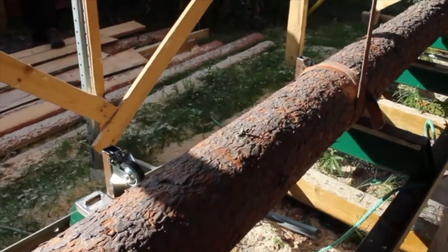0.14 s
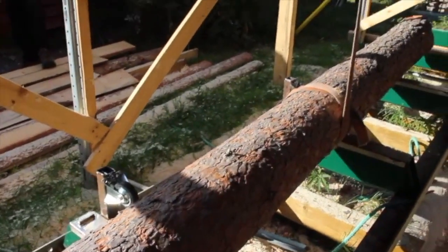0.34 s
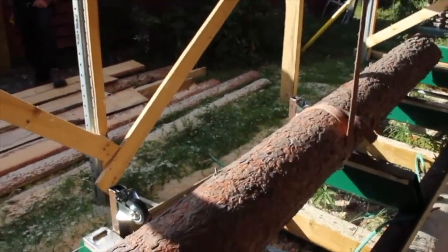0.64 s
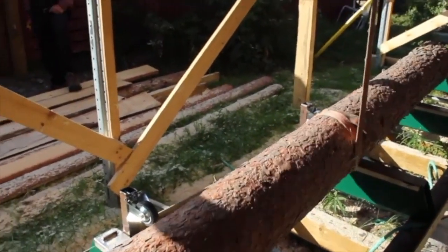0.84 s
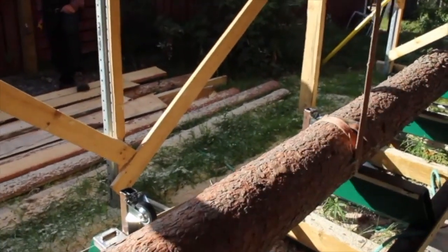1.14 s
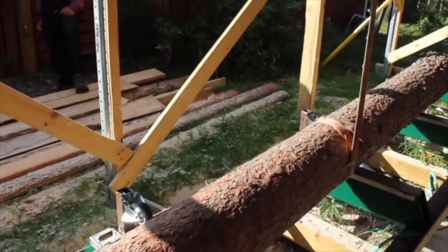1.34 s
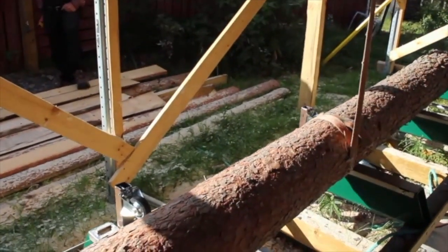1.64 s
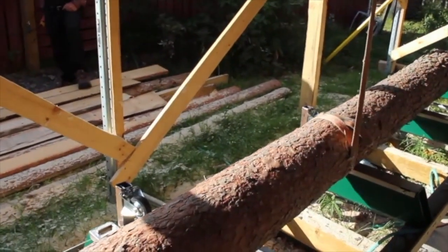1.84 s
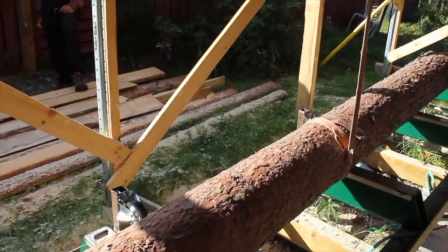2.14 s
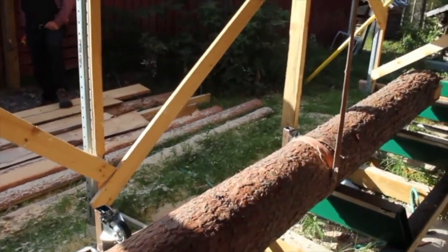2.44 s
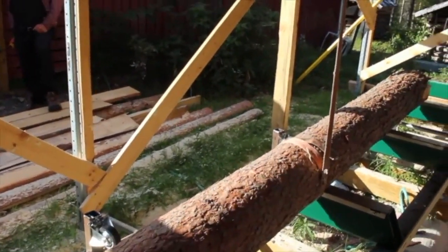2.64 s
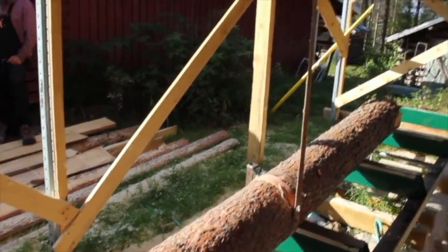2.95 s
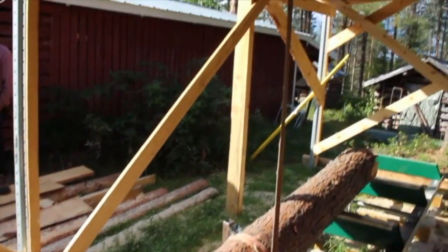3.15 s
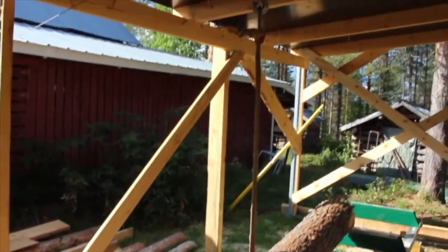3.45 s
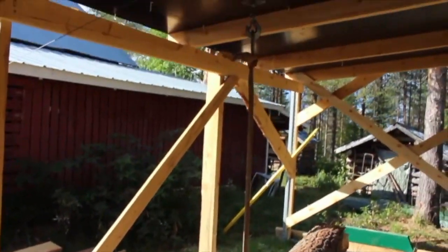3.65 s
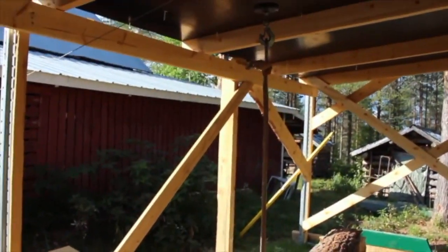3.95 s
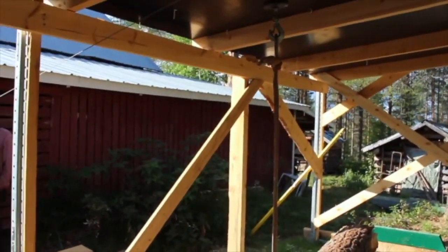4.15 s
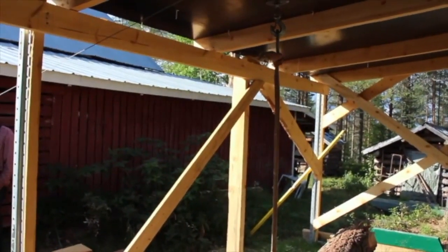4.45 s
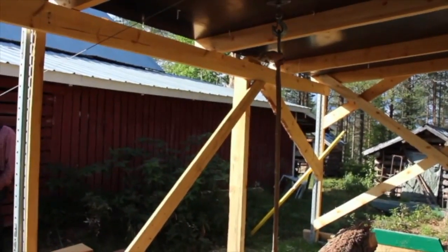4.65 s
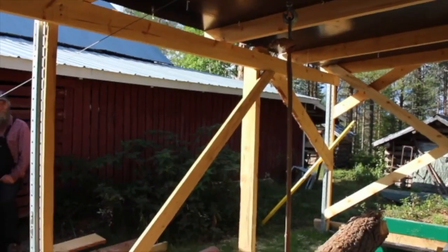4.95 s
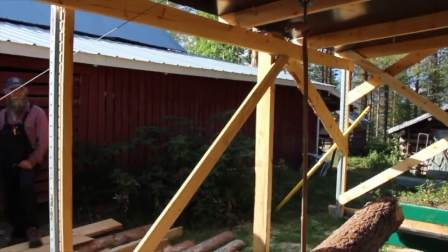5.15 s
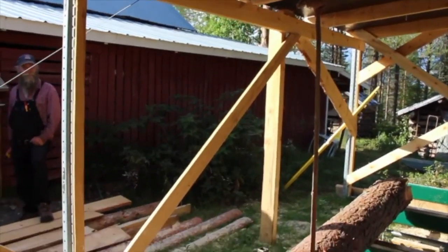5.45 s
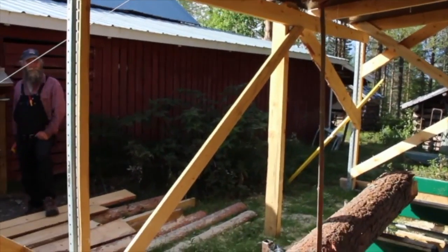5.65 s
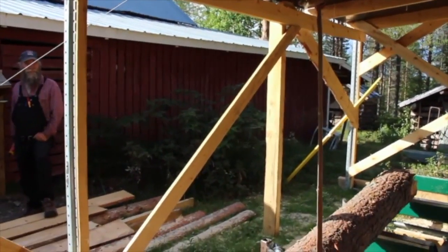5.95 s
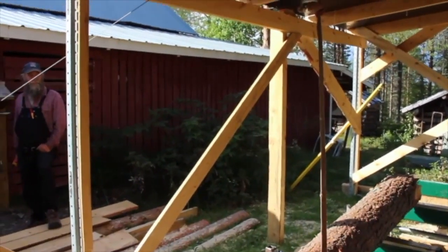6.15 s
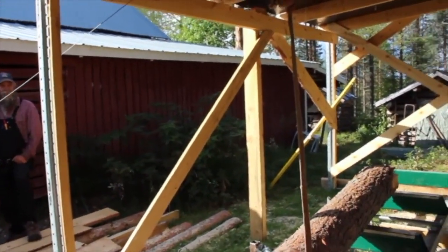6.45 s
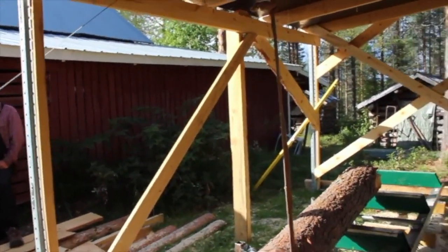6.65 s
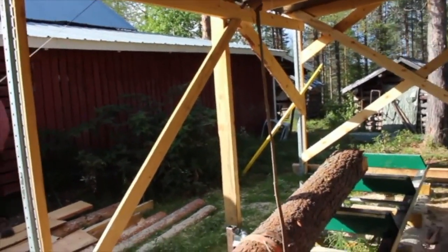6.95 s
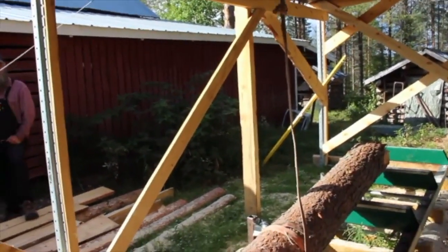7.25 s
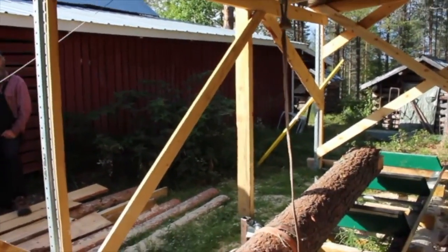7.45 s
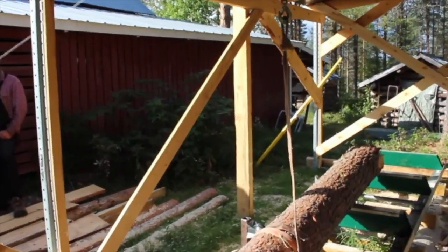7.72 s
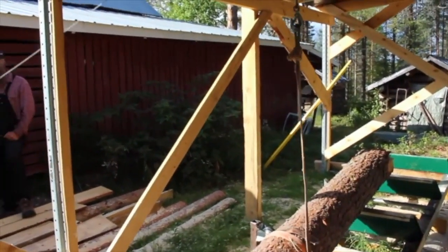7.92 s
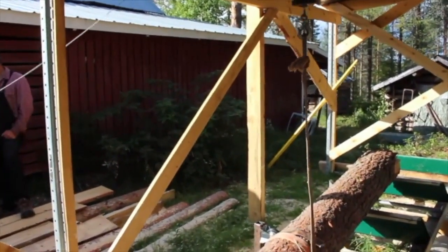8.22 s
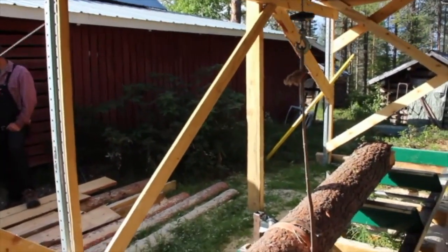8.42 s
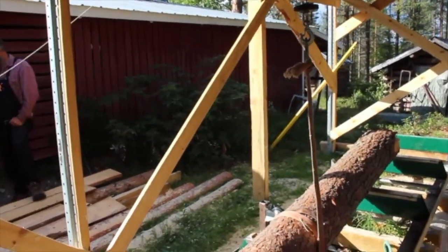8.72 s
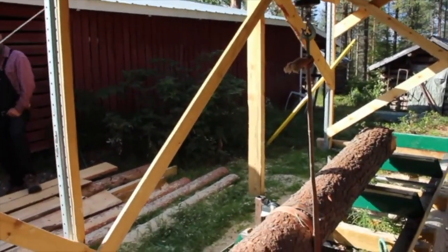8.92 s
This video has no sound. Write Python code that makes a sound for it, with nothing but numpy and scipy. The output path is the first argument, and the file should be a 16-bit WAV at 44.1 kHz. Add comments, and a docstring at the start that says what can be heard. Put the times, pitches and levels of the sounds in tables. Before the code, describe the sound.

Close up under an open timber roof, an electric winch runs in seven bursts, each opening and closing with a metallic clack. Gears rattle and grind, the loaded frame groans, and a log thumps hard twice and rocks with woody knocks. A strap rasps over bark. The later pulls are longer and steadier, in a quiet yard with soft air hiss.

```python
"""An electric winch under an open timber roof rolls a log: brake clacks are decaying contact noise plus
steel modes, and the gears are dense tiny impacts and a faint tooth-mesh tone coloured by their housing.
The loaded frame groans in narrow noise bands, the drum squeals once and the strap rasps by stick and slip.
The log grinds, thumps and creaks as ringing wood modes, its steel rails ring, and the beams hum and rumble.
Roof and a wooden wall answer with decaying noise tails; quiet yard air, a shaped hiss, lies underneath."""
import sys
import numpy as np
from scipy import signal
from scipy.fft import rfft, irfft, next_fast_len
from scipy.io import wavfile
from scipy.ndimage import uniform_filter1d, map_coordinates

SR = 44100
rng = np.random.default_rng(int(sys.argv[2]) if len(sys.argv) > 2 else 0)


def dump(signal):
    """Clip the signal to [-1, 1] and save it as 16-bit WAV at the path in sys.argv[1]."""
    limited = np.clip(np.atleast_2d(signal).T, -1, 1)
    pcm = np.round(limited * 32767).astype(np.int16)
    wavfile.write(sys.argv[1], SR, pcm)


def linear_from_db(decibels):
    """Turn decibels (scalar or array-like) into linear amplitude factors; 0 gives 1."""
    return 10 ** (np.asarray(decibels, float) / 20)


N = 400428
T = np.arange(N) / SR
COAST_DB_PER_S = 157  # fall of the gears and of the rolling log

# Pulls of the winch: (brake lets go [s], brake bites [s], gears [dB], letting-go clack [dB], biting clack [dB])
RUNS = [(0.2888, 0.866, -29, -6.5, -8), (1.8024, 2.189, -28, -3.5, -30), (3.5322, 3.828, -36, -3, -16),
        (4.1608, 4.4408, -32, -3.5, -13), (4.992, 5.4002, -30.5, -7, -10.5),
        (5.802, 6.6738, -27.5, -3.5, -9), (6.8684, 8.5886, -29, -9.5, -7)]
# Load on the frame, one list per loaded pull: (time [s], groan level [dB])
LOAD = [
    [(0.3, -35), (0.328, -26), (0.692, -26.5), (0.766, -21.5), (1.036, -37.5), (1.1, -59)],
    [(1.87, -16.5), (1.914, -35), (1.932, -19), (2.16, -41), (2.252, -41), (2.3, -31.5)],
    [(3.6, -12), (3.628, -24), (3.736, -51), (3.868, -32), (3.888, -51), (3.95, -53)],
    [(4.17, -38), (4.198, -31), (4.368, -31), (4.416, -67), (4.45, -41), (4.6, -59)],
    [(5.0, -38.5), (5.154, -20.5), (5.252, -32.5), (5.306, -26), (5.402, -25.5), (5.52, -60)],
    [(5.82, -34), (5.894, -31.5), (5.92, -19), (6.108, -23), (6.192, -34.5), (6.7, -46)],
]
# Drum binding once: (from [s], to [s], base pitch [Hz], level [dB])
SQUEAL = (.418, .452, 510, -17)
# Log landing: (time [s], nominal peak [dB])
THUMPS = [(1.854, -3), (3.587, -6.5)]
# Log rocking to rest near the end of a pull, and the strap ceasing to slip at 2.175 s: (time [s], nominal peak
# [dB])
SETTLES = [(0.963, -16), (2.175, -25), (3.834, -12.5), (4.445, -12)]
# Modes of brake, housing and hook: (frequency [Hz], relative level [dB], t60 before cap and scaling [s])
STEEL = [(534, -7, 0.076), (835, 8.5, 0.14), (1412, 2, 0.5), (1960, 3, 0.21), (2862, -20, 0.66),
         (3010, 17, 0.041), (3900, -12.5, 0.27), (4200, -9, 0.063), (4660, 4.5, 0.22)]


def unit(x):
    """Normalisation: scales a signal to rms 1."""
    return x / np.sqrt(np.mean(x ** 2) + 1e-20)


def along(points, hz):
    """Log-frequency interpolation: reads a curve of (frequency [Hz], value) points."""
    f, v = np.transpose(points)
    return np.interp(np.log(hz + 1), np.log(f + 1), v)


def wobble(rate):
    """Slow random modulation: a smooth curve through rate random knots a second."""
    knots = rng.standard_normal(int(N * rate / SR) + 4)
    return map_coordinates(knots, [T * rate])


def filtered(x, response):
    """Linear filtering: multiplies the spectrum by a real or complex response of frequency."""
    m = next_fast_len(x.shape[-1] + 8192)  # room for the filter to ring out
    spectrum = rfft(x, m) * response(np.fft.rfftfreq(m, 1 / SR))
    return irfft(spectrum, m)[..., :x.shape[-1]]


def pair(noise, alike):
    """Interchannel coherence: mixes two noises into left and right of a given likeness."""
    def weights(hz):
        turn = np.arccos(np.clip(along(alike, hz), -1, 1)) / 2
        return np.array([np.cos(turn), np.sin(turn)])
    mid, side = filtered(noise, weights)
    return np.array([mid + side, mid - side])


def gate(rows, rise, sag_db, fall_db):
    """Amplitude envelope of (from [s], to [s], level [dB]) rows: rise [s], sagging hold, fall [dB/s]."""
    out = 0
    for s, e, db in rows:
        sag = sag_db * (np.clip(T, s, e) - s)
        fall = fall_db * np.maximum(T - e, 0)
        out = out + np.clip((T - s) / rise, 0, 1) * linear_from_db(db - sag - fall)
    return out


def grit(rate, spread_db):
    """Shot noise: random tiny impacts of uneven size, rate a second."""
    chance, size, sign = rng.random(N), rng.standard_normal(N), rng.standard_normal(N)
    return unit((chance < rate / SR) * linear_from_db(spread_db * size) * sign)


def noise_band(turn, width_hz):
    """Quadrature modulation: carries two slow noises on a phase, making a band around its pitch."""
    a, b = filtered(rng.standard_normal((2, N)), lambda f: 1 / (1 + (f / width_hz) ** 2))
    return unit(a * np.cos(turn) + b * np.sin(turn))


def ring(modes, t, low_db, split_hz, slow):
    """Modal decay: damped sines of varied strength and pitch; low_db lifts those under split_hz."""
    hz, db, t60 = np.transpose(modes)[:, :, None]
    luck = rng.standard_normal((3, len(modes), 1))
    decay_db = 60 * t / (np.minimum(t60, .25) * slow)
    level = db + 2 * luck[0] + low_db * (hz < split_hz) - decay_db
    phase = 2 * np.pi * hz * (1 + 0.0125 * luck[1]) * t + luck[2]
    return np.sum(linear_from_db(level) * np.sin(phase), axis=0)


def turning():
    """Drive and inertia: gears spin up, coast down, race as the strap slips and grind as the drum binds."""
    spin_up_s, race_db, bind_db = 0.037, -14.5, -26.5  # race_db is relative to the slipping
    dropout_db, dropout_s = 39, 0.091  # the rattle drops out briefly after each heavy thump
    run = gate([row[:3] for row in RUNS], spin_up_s, 0, COAST_DB_PER_S)
    bind = gate([(SQUEAL[0], SQUEAL[1], bind_db)], 0.0064, 0, COAST_DB_PER_S)
    dropout = sum((T > s) * np.exp(-((T - s) / dropout_s) ** 4) for s, _ in THUMPS)
    return (run + bind + linear_from_db(race_db) * slipping()) * linear_from_db(-dropout_db * dropout + 0.46 * wobble(4.5))


def gears():
    """Impact excitation of resonances: teeth rattle in the housing; their steady mesh whines faintly."""
    # Narrow resonances of the gear housing: (frequency [Hz], relative level [dB])
    resonances = [(872.1, -39), (958.2, -53.5), (1120, -42.5), (1200, -41), (1249, -45), (1373, -43),
                  (1599, -51), (1701, -49.5), (2266, -51.5), (2406, -71), (2562, -53.5), (3036, -54.5),
                  (4797, -57.5), (5313, -60)]
    # Broad colour of the rattle: (frequency [Hz], relative spectral level [dB])
    colour = [(88, -50), (150, -10), (674, -2), (742, -7.5), (866, 2), (1670, -4), (1910, -7), (2310, -5),
              (3670, -13), (5400, -17.5), (15000, -28)]
    # Tooth mesh: (multiple of mesh rate [1], mean amplitude re rattle rms [dB])
    mesh = [(3, -30), (4, -27)]
    mesh_hz = 557

    def housing(f):
        peaks = sum(linear_from_db(db + 45.5) / (1 + ((f - hz) / (0.0076 * hz)) ** 2) for hz, db in resonances)
        return (.6 * linear_from_db(along(colour, f)) + peaks) / (1 + (f / 9300) ** 12)
    rattle = unit(filtered(grit(rate=6500, spread_db=2.5), housing))
    turn = 2 * np.pi * np.cumsum(mesh_hz * (1 + 0.0051 * wobble(4))) / SR
    whine = sum(linear_from_db(db + 3 * wobble(9)) * np.sin(k * turn) for k, db in mesh)
    return turning() * linear_from_db(wobble(25)) * (rattle + whine)


def clacks(events, swell, t60, slow):
    """Contact chatter and modal ringing: noise swells and dies, ringing steel unevenly, one mode most."""
    # Colour of the contacts: (frequency [Hz], relative spectral level [dB])
    colour = [(290, -43), (500, -13), (1050, -7), (3700, -3), (8580, -16.5), (16000, -38.5)]
    out, t = np.zeros(N + SR), np.arange(SR // 3) / SR
    rise = (1 - np.exp(-t / swell)) ** 4
    for s, db, low_db, hz in events:
        contacts = rise * linear_from_db(-60 * t / t60) * rng.standard_normal(len(t))
        crack = filtered(contacts, lambda f: linear_from_db(along(colour, f) + (low_db + 14) * (f < 1800)))
        modes = ring(STEEL, t, low_db + 9.5, split_hz=1800, slow=slow)
        modes += 3.3 * linear_from_db(-60 * t / (0.23 * slow)) * np.sin(2 * np.pi * hz * t)
        # loose parts break up the ringing
        loose = unit(filtered(rng.standard_normal(len(t)), lambda f: f < 220))
        clack = 2.58 * crack + 0.14 * rise * modes * (0.19 + loose)
        out[round((s - 1.4 * swell) * SR):][:len(t)] += linear_from_db(db) * clack
    return out[:N]


def brake():
    """Impact of brake on steel: a slower swell on letting go, a sharper one on biting."""
    let_go, bite = (-9, 2040), (-9.5, 3850)  # (relative low-frequency lift [dB], loudest ring [Hz])
    releases = [(s, db, *let_go) for s, _, _, db, _ in RUNS]
    bites = [(s, db, *bite) for _, s, _, _, db in RUNS]
    return (clacks(releases, swell=0.0038, t60=0.083, slow=0.37)
            + clacks(bites, swell=0.000831, t60=0.062, slow=0.68))


def jolts():
    """Impact of cable and hook: short contacts ring the steel as they jolt."""
    # Jolts: (time [s], nominal peak [dB], loudest ring [Hz])
    events = [(0.636, -13.5, 3880), (0.833, -17.5, 5550), (0.8593, -14, 3960), (0.9581, -15, 4250),
              (4.3168, -9.5, 1540), (4.3432, -15.5, 1990), (7.0929, -19, 2210), (7.555, -17.5, 2520)]
    low_db = -8
    return clacks([(s, db, low_db, hz) for s, db, hz in events], swell=0.000714, t60=0.064, slow=0.45)


def pull(lift_db):
    """Load envelope: each pull's gain, running out at 400 dB/s after it and silent before it."""
    out = np.zeros(N)
    for rows, lift in zip(map(np.array, LOAD), lift_db):
        s, db = rows.T
        after = np.maximum(T - s[-1], 0)
        out += (T >= s[0]) * linear_from_db(lift + np.interp(T, s, db) - 400 * after)
    return out


def groan():
    """Bending resonance: the frame shudders at its lowest pitch; strain brings out even overtones."""
    # Lowest bending pitch: (time [s], pitch [Hz])
    pitch = [(4.7, 255), (4.9, 222.9), (5.8, 220.7)]
    # Overtone gain of each loaded pull: (level re groan gain [dB])
    strain_db = [-7.5, -7, -5, 4.5, -11.5, -16]
    turn = 2 * np.pi * np.cumsum(np.interp(T, *np.transpose(pitch))) / SR
    colour = [(70, -10.5), (150, 3.5), (300, 14.5), (500, -45)]  # (frequency [Hz], relative level [dB])
    broad = unit(filtered(rng.standard_normal(N), lambda f: linear_from_db(along(colour, f))))
    lowest = noise_band(turn, width_hz=15.3)
    overtones = noise_band(2 * turn, width_hz=43.5)
    overtones += 0.53 * noise_band(4 * turn, width_hz=120)
    overtones += 0.67 * noise_band(6 * turn, width_hz=52)
    return pull([0] * len(LOAD)) * (0.78 * lowest + 0.48 * broad) + pull(strain_db) * overtones


def squeal():
    """Stick-slip tone of the binding drum: second and third multiples, fading out unevenly."""
    start, end, hz, db = SQUEAL
    envelope = np.clip((T - start) / 0.0015, 0, 1) * linear_from_db(-60 * np.maximum(T - end, 0) / 0.044)
    tone = np.sin(4 * np.pi * hz * T) + 0.67 * np.sin(6 * np.pi * hz * T)
    return envelope * linear_from_db(db + 6.4 * wobble(73.4)) * tone


def slipping():
    """Sliding-friction envelope: how hard the strap slips."""
    # Strap slipping: (from [s], to [s], level at the start [dB])
    slips = [(.4, .55, -36), (.84, 1.02, -37), (2.02, 2.195, -16), (3.53, 3.585, -30), (3.635, 3.74, -19),
             (4.29, 4.37, -29.5)]
    rise_s, sag_db_per_s, fall_db_per_s = 0.029, 23, 708
    return gate(slips, rise_s, sag_db_per_s, fall_db_per_s)


def strap():
    """Stick-slip friction over bark: dense grains in ragged patches, coloured by the steel hook."""
    # Colour of the rasp: (frequency [Hz], relative spectral level [dB])
    colour = [(1060, -33), (1800, -10.5), (5460, -10), (12100, -23.5), (13200, -54), (14600, -24),
              (15000, -90)]

    def hook(f):
        return 1 + sum(0.95 / (1 + ((f - hz) / 110) ** 2) for hz, _, _ in STEEL)
    z = signal.stft(grit(rate=14000, spread_db=-0.5), nperseg=256)[2]
    # noise smoothed over frequency, then over time
    patches = uniform_filter1d(rng.standard_normal(z.shape), size=7, axis=0)
    patches = uniform_filter1d(patches, size=5, axis=1)
    ragged = signal.istft(z * linear_from_db(3.5 * unit(patches)), nperseg=256)[1][:N]
    return slipping() * unit(filtered(ragged, lambda f: linear_from_db(along(colour, f)) * hook(f)))


def rolling():
    """Rolling contact noise: the log grinds round on its bed in a rough band that climbs as it turns."""
    # Rolling log: (time [s], band centre [Hz], level [dB])
    path = [(1.899, 290, -28), (2.02, 480, -32), (2.131, 558.5, -33.5), (2.2, 761.6, -26.5),
            (2.32, 800, -41.5)]
    s, hz, db = np.transpose(path)
    turn = 2 * np.pi * np.cumsum(np.interp(T, s, hz)) / SR
    fade_db = COAST_DB_PER_S * np.maximum(T - s[-1], 0)
    return (T > s[0]) * linear_from_db(np.interp(T, s, db) - fade_db) * noise_band(turn, width_hz=110)


def knocks(events, deep_db, spread):
    """Modal excitation of wood by contacts over spread [s]; light ones are crisper and die sooner."""
    # Modes of log and bed: (frequency [Hz], relative level [dB], t60 before cap and scaling [s])
    modes = [(148, -13, 5.0), (272, 8.5, 0.063), (500.6, 9, 0.076), (646, -2.5, 0.3), (972, 9.5, 0.073),
             (1315, -1, 0.14), (1250, -15, 0.33), (1528, -21, 0.35), (1656, 1, 0.069), (1990, -9.5, 0.16)]
    out, t = np.zeros(N + SR), np.arange(SR // 2) / SR
    for s, db in events:
        slow = np.clip(0.4 + 0.0067 * db, .1, 1)
        dull = filtered(rng.standard_normal(len(t)), lambda f: 1 / (1 + (f / 6000) ** 2))
        tick = linear_from_db(-.25 * db - 60 * t / (0.11 * slow)) * dull
        wood = ring(modes, t, deep_db + 13.5, split_hz=400, slow=slow) * (1 - np.exp(-t / 0.0007))
        contacts = (t <= spread) * rng.standard_normal(len(t))  # a single contact when spread is 0
        wood = signal.fftconvolve(wood, contacts / np.linalg.norm(contacts))[:len(t)]
        out[round(s * SR):][:len(t)] += linear_from_db(db - 5.0) * (wood + 0.56 * tick)
    return out[:N]


def log_on_bed():
    """Impact and creak: the log lands, creaks and rocks to rest, the rocking spread over 40 ms."""
    # Log creaking on its bed: (time [s], nominal peak [dB])
    creaks = [(0.085, -31.5), (0.121, -34.5), (0.135, -33), (0.154, -36.5), (0.194, -28.5), (0.213, -35),
              (0.229, -31), (0.245, -36), (8.974, -37), (9.059, -34.5)]
    thump_deep_db, settle_deep_db, creak_deep_db = -14, -11, -9.5  # relative lift of the deep modes
    single = knocks(THUMPS, thump_deep_db, spread=0) + knocks(creaks, creak_deep_db, spread=0)
    return single + knocks(SETTLES, settle_deep_db, spread=.04)


def rails():
    """Free vibration: the steel rails ring on faintly whenever the log rocks to rest or the strap stops
    slipping."""
    # Modes of the bed rails: (frequency [Hz], mean relative level [dB], t60 [s])
    steel_rails = [(651, 0.5, 1.0), (830, 0, 0.71), (910, 5, .35), (1140, -8, 0.55), (1335, -6.5, 0.82),
                   (1530, -17, .6)]
    rails_db = -26.5  # re the nominal peak of each rocking or slip-end blow
    out, t = np.zeros(N + SR), np.arange(SR) / SR
    hz, level, t60 = np.transpose(steel_rails)[:, :, None]
    luck = rng.standard_normal((len(SETTLES), len(steel_rails), 1))
    for (s, db), chance in zip(SETTLES, luck):
        modes = linear_from_db(level + 2.1 * chance - 60 * t / t60) * np.sin(2 * np.pi * hz * t)
        rise = 1 - np.exp(-t / 0.011)
        out[round(s * SR):][:len(t)] += linear_from_db(db + rails_db) * rise * modes.sum(axis=0)
    return out[:N]


def beams():
    """Beating and forced vibration: close tones hum after landings; load, shakes and winch rumble."""
    # Tones of the long beams: (frequency [Hz], mean relative level [dB])
    pitches = [(84, -2.5), (99, -4), (127, -6), (159, -2)]
    # Beams shaken hard: (time [s], rise [s], level [dB])
    shakes = [(1.854, 0.077, -32), (3.587, 0.029, -27), (5.85, 0.2, -29.5)]
    hum_db, hum_fade_db_per_s, shake_fade_db_per_s = -46, 3, 72
    load_rumble_db, run_rumble_db = -16, -51  # (re groan gain), (while the drum turns)
    colour = [(45, -57), (80, 2.5), (160, 10.5), (200, -47)]  # (frequency [Hz], relative level [dB])
    tones = sum(linear_from_db(level + 1.3 * wobble(2.4)) * np.sin(2 * np.pi * hz * T + wobble(1.91))
                for hz, level in pitches)
    rumble = filtered(rng.standard_normal(N), lambda f: linear_from_db(along(colour, f)))
    hums = [(T > s) * linear_from_db(hum_db - hum_fade_db_per_s * (T - s)) for s, _ in THUMPS]
    humming = np.max(hums, axis=0)
    shaken = sum(gate([(s, s + rise, db)], rise, 0, shake_fade_db_per_s) for s, rise, db in shakes)
    running = gate([(s, e, run_rumble_db) for s, e, *_ in RUNS], 0.068, 0, 40)
    loaded = uniform_filter1d(pull([load_rumble_db] * len(LOAD)), size=SR // 8)
    return humming * unit(tones) + (shaken + running + loaded) * unit(rumble)


def roof(x):
    """Reverberation: roof and wall answer, each pitch dying at its own speed; fresh tail every 1/4 s."""
    # Reverberation time: (frequency [Hz], t60 [s])
    decay = [(150, 0.65), (1000, 0.35), (4000, 0.32), (12000, 0.21)]
    # Coherence of the tail: (frequency [Hz], left-right likeness [1])
    alike = [(200, 0.84), (2000, 0.9), (8000, 0.037)]
    out, hop, size = np.zeros((2, N + 2 * SR)), SR // 4, SR * 3 // 4
    for start in range(0, N, hop):
        hz, t, z = signal.stft(rng.standard_normal((2, size)), SR, nperseg=256)
        dying = z * linear_from_db(-60 * t / along(decay, hz)[:, None])
        tail = pair(signal.istft(dying, SR, nperseg=256)[1], alike)
        wet = signal.fftconvolve(x[None, start:start + hop], tail / np.linalg.norm(tail[0]), axes=1)
        out[:, start + SR // 200:][:, :wet.shape[1]] += wet  # 5 ms after the direct sound
    return out[:, :N]


def air():
    """Diffuse broadband noise: far leaves and yard hiss, partly alike at the two ports."""
    # Colour of the hiss: (frequency [Hz], relative spectral level [dB])
    colour = [(15, -36), (25, -12), (76, 0.5), (775, -7.5), (1130, -9.5), (4610, -16.5), (13200, -35.5),
              (16000, -35)]
    # Coherence of the hiss: (frequency [Hz], left-right likeness [1])
    alike = [(60, 0.27), (400, 0.64), (2400, 0.048)]
    air_db = -48  # mean level
    hiss = filtered(pair(rng.standard_normal((2, N)), alike), lambda f: linear_from_db(along(colour, f)))
    return linear_from_db(air_db + wobble(2.397)) * unit(hiss)


def scene():
    """Superposition: the winch and log reach two ports directly and by way of the roof, over the air."""
    # Level difference of the microphone ports: (frequency [Hz], left minus right [dB])
    tilt = [(1000, -0.1), (3500, 2.5)]
    # Phase difference of the ports: (frequency [Hz], lead of the left port [rad])
    lead = [(200, 0.011), (2150, 0.85), (6500, 1.2), (12000, 2.15)]
    near = gears() + brake() + jolts() + groan() + squeal() + strap()
    near += rolling() + log_on_bed() + rails() + beams()
    side = np.array([[.5], [-.5]])  # each port takes half of the difference
    direct = filtered(near, lambda f: linear_from_db(side * along(tilt, f)) * np.exp(1j * side * along(lead, f)))
    return direct + linear_from_db(-10.5) * roof(near) + air()


def roll_off(x):
    """The treble ends steeply here."""
    return signal.sosfilt(signal.butter(12, 16460, fs=SR, output="sos"), x)


def record(dry):
    """Saturation and band limiting: the loudest peaks round off at full scale, then the top is cut."""
    top_hz = 15900
    rounded = dry / (1 + np.abs(dry) ** 8) ** (1 / 8)
    mix = filtered(rounded, lambda f: f < top_hz)
    return roll_off(mix)


dry = scene()
out = record(dry)
dump(out)
```